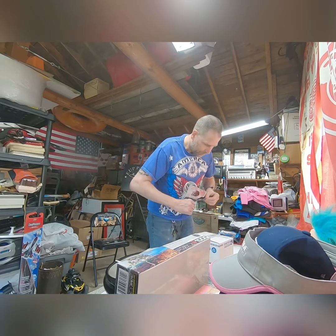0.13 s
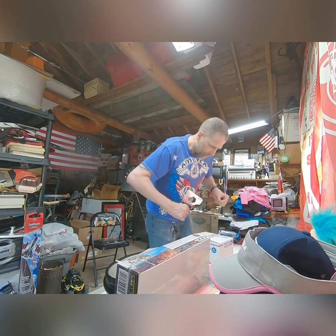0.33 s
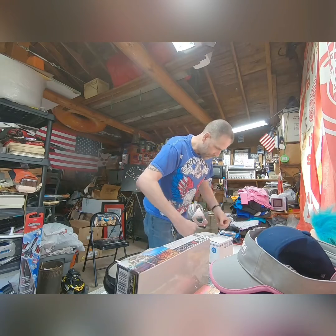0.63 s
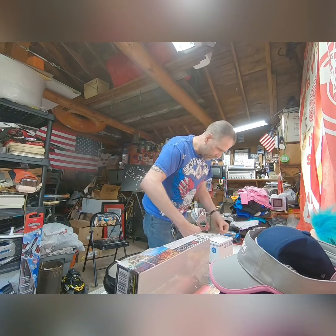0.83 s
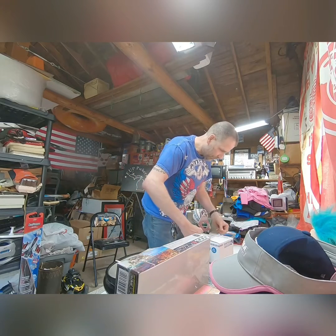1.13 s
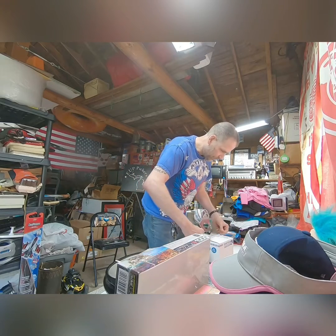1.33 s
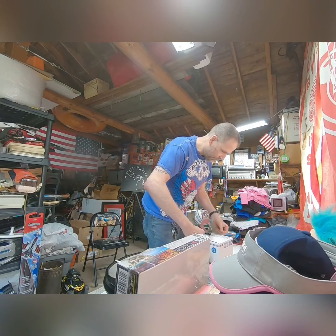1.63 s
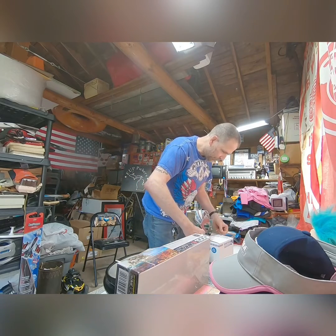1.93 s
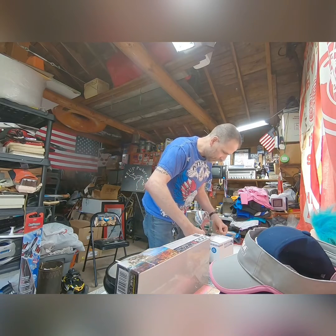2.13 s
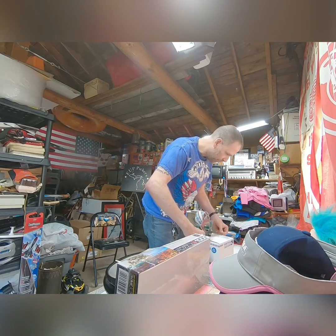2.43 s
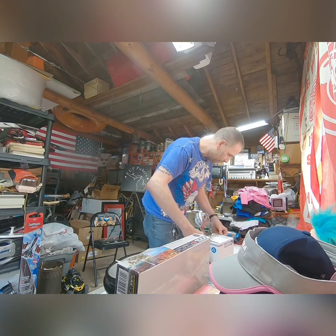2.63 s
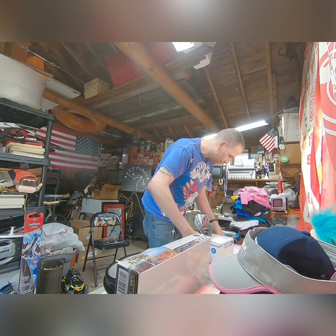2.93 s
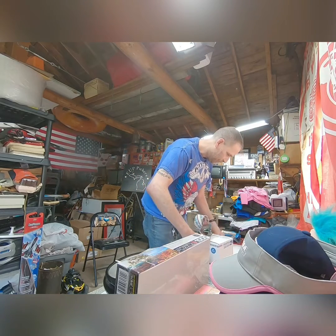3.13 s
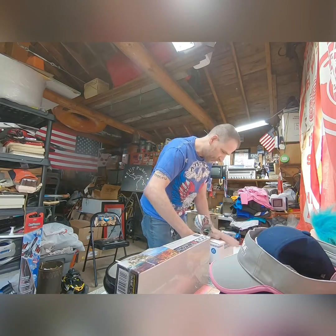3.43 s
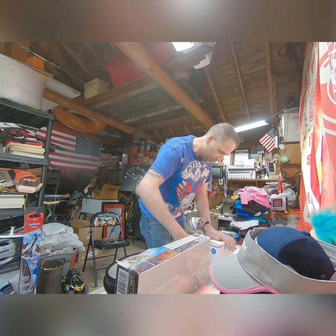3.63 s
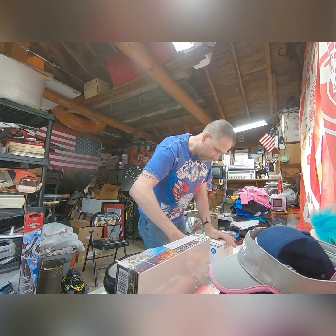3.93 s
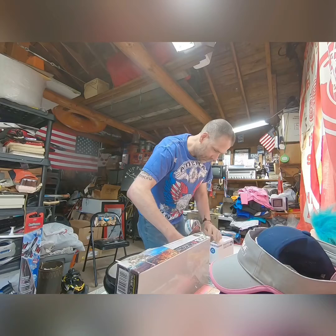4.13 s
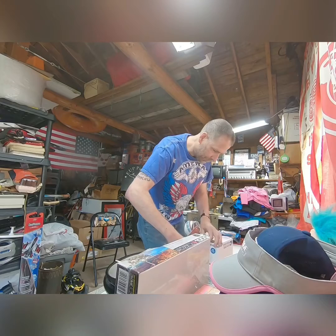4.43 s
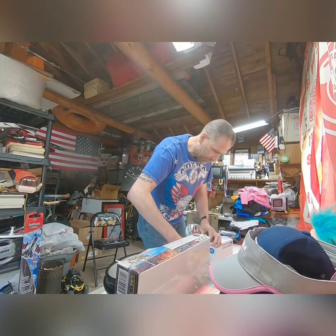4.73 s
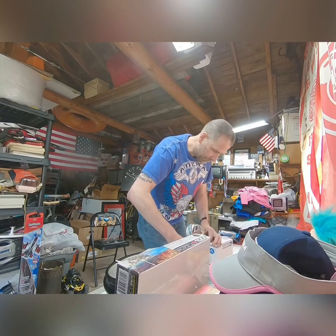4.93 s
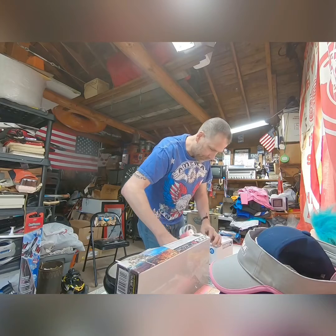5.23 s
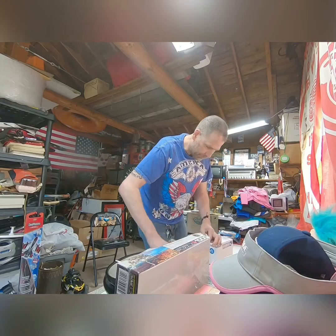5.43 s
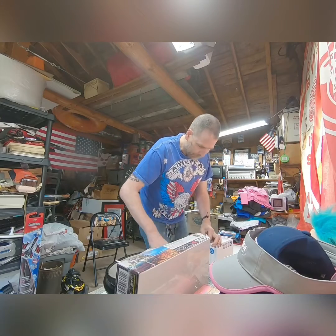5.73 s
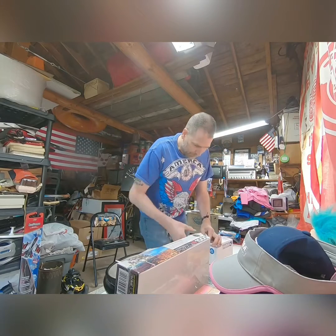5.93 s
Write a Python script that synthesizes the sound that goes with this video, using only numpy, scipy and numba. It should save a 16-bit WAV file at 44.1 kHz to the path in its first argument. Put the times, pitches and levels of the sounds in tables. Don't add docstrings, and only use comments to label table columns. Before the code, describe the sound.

Almost at once, packing tape is jerked from a hand-held gun with a bright, dry rip. Only a faint low hum and tiny ticks follow. Later come hand scuffs on cardboard, deep box and bench knocks, and clusters of screeching, cracking tape pulls. The last pulls end in a run of muffled thumps. Close small stereo microphone, short damped garage.

```python
import sys
import numpy as np
from scipy import signal
from scipy.fft import rfft, irfft, next_fast_len
from scipy.io import wavfile
from scipy.ndimage import uniform_filter1d
from numba import njit

SR = 44100
rng = np.random.default_rng(int(sys.argv[2]) if len(sys.argv) > 2 else 0)


def undo_db(level):
    steps = np.asarray(level, float) / 20
    return 10 ** steps


def digitize_waveform(pressure):
    field = np.atleast_2d(pressure).T
    bounded = np.clip(field, -1, 1)
    quanta = np.round(bounded * 32767).astype(np.int16)
    wavfile.write(sys.argv[1], SR, quanta)


N = 269010
SPLIT_HZ = 3880
ON_BOX_S = 1.5

# pitch_hz, level_db [dB per Hz]
SLIP_COLOUR = [(240, -29.5), (400, 2.5), (481, -12), (676, -7.5), (742, -9.5), (1140, -7), (1270, -12),
               (1460, -2.5), (1840, -5.5), (2800, -1.5), (4730, -0.5), (8370, -3), (13500, -25.5),
               (14800, -37.5), (16000, -52.5)]
# pitch_hz, width_hz, level_db
GUN_RINGS = [(1160, 58, -5), (1670, 40, -2), (1960, 26, -4), (2160, 73, -4), (2860, 99, -1), (3670, 150, 0),
             (3980, 40, -1), (5700, 47, -8), (7270, 89, -6), (8140, 170, -9)]
# pitch_hz, width_hz, level_db
BOX_AIR = [(70, 32, 0.5), (100, 11, 6), (150, 25, 1.5), (181, 36, -1.5)]
# pitch_hz, width_hz, level_db
BOX_WALLS = [(247, 71, 1.5), (347, 37, -1), (420, 35, -8), (600, 200, -11.5)]


def unit(x):
    return x / np.sqrt(np.mean(x ** 2))


def on_log(hz, table):
    f, v = np.transpose(table)
    return np.interp(np.log(hz + 1), np.log(f), v)


def colour(x, table):
    log_gain = on_log(np.fft.rfftfreq(4096, 1 / SR), table) * np.log(10) / 20
    cepstrum = irfft(log_gain)
    cepstrum[1:2048] *= 2
    cepstrum[2049:] = 0
    response = irfft(np.exp(rfft(cepstrum)))
    return signal.fftconvolve(x, response)[:len(x)]


def band(x, hz, width_hz):
    return signal.lfilter(*signal.iirpeak(hz, hz / width_hz, fs=SR), x)


def ring(x, modes):
    return sum((-1) ** k * undo_db(db) * band(x, hz, width) for k, (hz, width, db) in enumerate(modes))


def cut(x, order, hz, kind="low"):
    return signal.sosfilt(signal.butter(order, hz, kind, fs=SR, output="sos"), x)


def halves(x):
    return unit(cut(x, 4, SPLIT_HZ)), unit(cut(x, 4, SPLIT_HZ, "high"))


def walk(rate):
    k = int(SR / rate)
    steps = np.repeat(rng.standard_normal(N // k + 1), k)
    return 1.7 * uniform_filter1d(uniform_filter1d(steps, k), k)[:N]


def add(out, s, sound):
    i = int(s * SR)
    out[..., i:i + sound.shape[-1]] += sound[..., :N - i]


def opposite(x):
    return x * np.array([[1], [-1]])


def bursts(rows, attack_s, fall_db_s):
    gain, t = np.zeros(N), np.arange(SR // 3) / SR
    for s, hold, db in rows:
        rise = np.minimum(t / (attack_s + 0.3 * abs(hold)), 1)
        fall_db = fall_db_s * np.maximum(t - attack_s - abs(hold), 0)
        add(gain, s, undo_db(db - fall_db) * rise)
    return gain


def hum():
    # pitch_hz, level_db [dB per Hz]
    hum_colour = [(12, -49.5), (20, -9.5), (85, -10), (112, -18.5), (125, -6), (148, -4.5), (211, -14),
                  (263, -24), (386, -30.5), (468, -43.5), (725, -28), (1010, -36), (2490, -45.5),
                  (4810, -43), (14000, -57)]
    level_db = -64.5
    mid, side = (colour(rng.standard_normal(N), hum_colour) for _ in range(2))
    side = cut(side, 1, 500, "high")
    deep = cut(mid, 2, 120)
    swell = undo_db(4 * walk(4.5) - 3.5)
    pair = mid + (swell - 1) * deep + undo_db(6.5) * opposite(side)
    return undo_db(level_db + 0.2 * walk(6.6)) * pair / np.std(mid)


def room(x):
    # pitch_hz, share [0 to 1]
    likeness = [(100, 0.59), (350, 1), (700, 0.56), (2500, 1), (6000, 0.28)]
    # pitch_hz, fall_s
    echo_fall = [(150, .3), (1000, .29), (4000, .25), (10000, .18)]
    first_echo_s = 0.0021
    t, echo = np.arange(SR // 2) / SR, 0
    for hz in 60 * 2 ** np.arange(0, 8.1, .5):
        mid, side = (unit(band(rng.standard_normal(len(t)), hz, hz / 3)) for _ in range(2))
        like = np.clip(on_log(hz, likeness), 0, 1)
        fall_s = on_log(hz, echo_fall)
        pair = np.sqrt(1 + like) * mid + opposite(np.sqrt(1 - like) * side)
        echo = echo + np.sqrt(hz / fall_s) * pair * undo_db(-60 * t / fall_s)
    echo = echo * (t > first_echo_s)
    return signal.fftconvolve(x[None], echo / np.sqrt(np.sum(echo ** 2) / 2))[:, :N]


def scatter(x):
    # pitch_hz, level_db
    apart = [(60, -15), (110, -15.5), (200, -16), (380, -15), (700, -4.5), (1290, -7), (2380, -8.5),
             (4400, -15.5), (8120, -1), (15000, -5)]
    t = np.arange(2048) / SR
    bounce = rng.standard_normal(len(t)) * np.exp(-t / .014)
    bounce = bounce / np.sqrt(np.sum(bounce ** 2))
    side = colour(signal.fftconvolve(x, bounce)[:N], apart)
    return undo_db(3.5) * opposite(side)


def scuffs():
    # pitch_hz, width_hz, level_db
    card = [(260, 61, 13), (509, 160, 4.5), (737, 1400, -0.5)]
    # start_s, hold_s, level_db
    slides = [(2.04, 0.0092, -56.5), (2.7, 0.024, -55), (2.765, 0.008, -47.5), (2.87, 0.14, -61.5),
              (4.09, 0.015, -67), (4.175, 0.04, -58), (4.4, 0.04, -63.5), (4.55, 0.029, -68),
              (4.61, .02, -60.5), (4.67, 0.02, -78), (5.19, 0.011, -60), (5.27, .005, -85),
              (5.315, .01, -70)]
    skin = rng.standard_normal(N) * undo_db(2 * walk(70))
    drag = ring(ring(skin, card), [(520, 800, 0)])
    return bursts(slides, attack_s=0.0041, fall_db_s=226) * undo_db(-3.0) * unit(drag)


def knocks(rows, wall_hz):
    out, t = np.zeros(N), np.arange(SR // 2) / SR
    push = t / .0015 * np.exp(-t / 0.0035)
    air = ring(push, BOX_AIR)
    wall = ring(push, [(wall_hz, 60, 3)] + BOX_WALLS)
    air, wall = air / np.abs(air).max(), wall / np.abs(wall).max()
    for s, db, hz, fall_db, wall_db in rows:
        boom_fall = undo_db(min(fall_db, -1.5) * hz * t)
        boom = np.sin(2 * np.pi * hz * t) * boom_fall * (1 - np.exp(-t / 0.0055))
        thud = boom + undo_db(-8.0) * (s > ON_BOX_S) * air + undo_db(wall_db) * wall
        add(out, s, undo_db(db - 3) * thud)
    return out


def thumps():
    # start_s, peak_db, boom_hz, decay_db [per cycle], wall_ring_db
    bench_hits = [(2.77, -28, 76, -7, -4.5), (3.009, -18, 84, -7, -12), (3.048, -13.5, 81, -9.5, -6.5),
                  (3.086, -48, 64, -4, -22), (3.129, -24.5, 66.4, -17, -25),
                  (3.466, -2.5, 92.3, -6.5, -14.5), (3.55, -22.5, 92, -3, 4.5), (3.607, -26, 84, -1, -2),
                  (3.754, -48, 75.4, 2, -23), (3.843, -27.5, 67.5, -2.5, 2), (4.19, -29.5, 70, -4.5, -8.5),
                  (4.223, -25, 62.5, -22, -25), (4.819, -36, 90, -4, -4.5), (4.86, -38, 99, 0, 1.5),
                  (5.013, -15.5, 97, -3.5, -9.5), (5.357, -35.5, 95, -3, -24), (5.523, -23, 75.5, -2, -7),
                  (5.584, -16, 67, -3.5, -1), (5.618, -15.5, 70, -17, -4), (5.645, -14.5, 63, -30, -3),
                  (5.699, -23.5, 64.6, -4, -27), (5.76, -20, 74, -15, -8.5), (5.912, -26.5, 65.2, -24, -18)]
    return knocks(bench_hits, wall_hz=215)


def raps():
    # start_s, peak_db, boom_hz, decay_db [per cycle], wall_ring_db
    box_hits = [(.228, -19, 195, -3, 2.3), (2.048, -75.5, 147.5, -5, -3), (2.443, -46.5, 193, -2.5, 4),
                (2.679, -43.5, 167, -2.5, -0.5), (3.43, -17, 199, -4, -14.5), (4.028, -21, 150, -15, -20),
                (4.67, -41, 129, -9, -19), (4.954, -23, 157, -2, -8), (4.985, -20, 134, -9, 2),
                (5.51, -14.5, 115.3, -9.5, -23), (5.738, -27.5, 157, 4.5, 2), (5.863, -22, 181, -6.5, -14)]
    return knocks(box_hits, wall_hz=370)


def box_shakes():
    # start_s, hold_s, level_db
    shake_rows = [(.215, 0.013, -21), (.24, .1, -35.5), (3.005, 0.005, -26), (3.045, 0.0017, -24.5),
                  (3.44, 0.1, -25), (3.55, 0.086, -26.5), (3.74, 0.033, -24), (3.825, 0.026, -30),
                  (4.025, 0.015, -27.5), (4.19, 0.14, -58.5), (4.4, 0.039, -55), (4.93, 0.043, -23),
                  (5.01, 0.011, -35.5), (5.055, 0.011, -26.5), (5.585, 0.0093, -19), (5.62, 0.026, -30)]
    shake = rng.standard_normal(N)
    push = bursts(shake_rows, attack_s=0.0099, fall_db_s=352.5) * shake
    on_box = np.arange(N) / SR > ON_BOX_S
    rumble = ring(push * on_box, BOX_AIR) + undo_db(-6.0) * ring(push, BOX_WALLS)
    return undo_db(-8) * rumble / np.std(ring(shake, BOX_AIR))


def squeals():
    # start_s, length_s, pitch_hz,
    # level_db
    squeal_rows = [(0.207, 0.012, 6960, -25), (3.135, 0.09, 2900, -54), (3.561, 0.0065, 2890, -19),
                   (4.03, 0.031, 4050, -36), (4.818, 0.022, 3510, -26), (4.818, 0.019, 1534, -41),
                   (4.863, 0.018, 3530, -37), (4.941, .025, 3930, -24), (5.062, 0.026, 7370, -28),
                   (5.099, .02, 3900, -50), (5.171, 0.018, 4120, -49), (5.588, 0.0097, 2810, -53),
                   (5.595, 0.14, 4000, -46.5), (5.644, 0.018, 2810, -32.5), (5.641, 0.038, 2180, -40),
                   (5.631, 0.072, 7430, -44)]
    out, t = np.zeros(N), np.arange(4096) / SR
    for s, length, hz, db in squeal_rows:
        rub = unit(band(rng.standard_normal(4096), hz, .03 * hz))
        swell = np.sin(np.pi * np.clip(t / length, 0, 1))
        add(out, s, undo_db(db) * rub * swell)
    return out


def snaps():
    # start_s, peak_db, treble_db, ring_hz
    snap_rows = [(.173, -19.5, -15, 3157), (2.409, -64, -13.5, 1790), (2.4471, -41.5, -16.5, 3630),
                 (2.4564, -44, -20, 3200), (3.0065, -46.5, -15, 1690), (3.049, -38, -9, 2200),
                 (3.4276, -50, -15.5, 1580), (3.479, -25.5, -1.5, 3730), (3.7303, -27, -1, 1960),
                 (3.7472, -26.5, -11, 3200), (3.8335, -29.5, -26, 2800), (3.8482, -24.5, -20, 2830),
                 (4.0281, -24.5, -10, 4060), (4.5534, -46, -19, 2570), (4.5987, -49, -25, 1530),
                 (4.6112, -44, -16, 3250), (4.672, -42.5, -13.5, 3160), (4.773, -55.5, -14, 3570),
                 (4.8162, -25.5, -9.5, 3440), (4.8599, -24, -12.5, 3950), (4.9207, -37.5, 3, 3670),
                 (4.9417, -23.5, -9, 3570), (5.011, -17.5, -12, 3180), (5.032, -27.5, -7.5, 3960),
                 (5.1085, -34, -28.5, 3930), (5.1645, -38.5, -18, 3270), (5.2716, -39, -22.5, 1700),
                 (5.3225, -42, -11.5, 3250), (5.5829, -48, -45, 2940), (5.6446, -34, -24, 2800)]
    # start_s, peak_db, ring_hz
    tick_rows = [(.8644, -72, 1660), (1.4094, -74, 4070), (2.044, -62, 2100), (2.7062, -56, 1680),
                 (2.7701, -53, 1870), (2.8988, -48, 3810), (3.1413, -44, 2850), (3.1946, -47, 3010),
                 (3.2894, -57, 4630), (5.4843, -50, 2790), (5.8636, -36, 3430), (6.0556, -44, 3790),
                 (6.0744, -46, 1980)]
    tick_treble_db, own_ring_db, pan_spread_db = -18, -2, 2.5
    out, t = np.zeros((2, N)), np.arange(4096) / SR
    for s, db, treble_db, hz in snap_rows + [(s, db, tick_treble_db, hz) for s, db, hz in tick_rows]:
        fade = np.exp(-t / .0012) + undo_db(-13) * np.exp(-t / .012)
        burst = rng.standard_normal(len(t)) * fade
        low, high = halves(colour(burst, SLIP_COLOUR))
        own = unit(band(burst, hz, .13 * hz))
        gun = unit(ring(burst, GUN_RINGS))
        crack = low + undo_db(treble_db + 9.0) * high + undo_db(own_ring_db) * own + undo_db(-12) * gun
        pan_db = opposite(pan_spread_db * rng.standard_normal()) / 2
        add(out, s, crack / np.abs(crack).max() * undo_db(db + 9.0 + pan_db))
    return out


@njit
def sweep(x, hz, share):
    y, b, l = np.empty(len(x)), 0., 0.
    for i in range(len(x)):
        g = np.tan(np.pi * hz[i] / SR)
        v = (b + g * (x[i] - l)) / (1 + g * (g + share))
        b, l, y[i] = 2 * v - b, l + 2 * g * v, share * v
    return y


def pulls():
    # start_s, hold_s, slip_db, treble_db, taut_tape_hz
    jerk_rows = [(.172, 0.055, -22, -5.5, 2990), (0.226, 0.096, -27, -4.5, 2777),
                 (2.033, 0.0074, -75, -12.5, 2100), (3.005, 0.014, -47, -3.5, 3050),
                 (3.047, 0.0021, -41, -1.5, 2700), (3.438, 0.042, -43, -14.5, 3700),
                 (3.474, 0.059, -36, -2, 3160), (3.524, .045, -24.5, -5.5, 3280),
                 (3.592, 0.047, -26.5, -5.5, 3290), (3.747, 0.037, -26, -4.5, 3130),
                 (3.827, 0.017, -38, -2, 3330), (4.026, 0.016, -31, -4.5, 3440),
                 (4.178, 0.032, -53.5, -37, 2830), (4.265, 0.037, -57, -49, 2180),
                 (4.382, 0.047, -66.5, -19, 3200), (4.918, 0.0035, -42.5, -4, 3650),
                 (4.939, 0.02, -29.5, -9, 3850), (4.981, 0.014, -43, -17.5, 3500),
                 (5.014, 0.025, -32.5, -16.5, 3350), (5.049, 0.023, -25.5, -13, 3230),
                 (5.08, .035, -39, -32.5, 2400), (5.154, 0.015, -38, -34, 3300),
                 (5.582, 0.01, -36, -46, 2780), (5.632, .03, -34, -20, 2800)]
    attack_s, fall_db_s, ring_db, slacken_hz_s = .006, 518.5, -6, 895.5
    slips_per_s = 9000
    hits = (rng.random(N) < slips_per_s / SR) * rng.standard_normal(N)
    slips = unit(hits * undo_db(1.2 * rng.exponential(size=N)))
    gust_db = 2 * walk(150) + .6 * walk(45)
    low, high = halves(colour(slips * undo_db(gust_db), SLIP_COLOUR))
    force = bursts([row[:3] for row in jerk_rows], attack_s, fall_db_s)
    treble_rows = [(s, hold, db + treble_db) for s, hold, db, treble_db, _ in jerk_rows]
    sizzle = bursts(treble_rows, attack_s, fall_db_s)
    tape = force * low + sizzle * high * undo_db(2.5 * walk(67))
    drive = undo_db(ring_db) * force * slips

    t = np.arange(N) / SR
    start, taut_hz = np.array(jerk_rows)[:, 0], np.array(jerk_rows)[:, 4]
    last = np.maximum(np.searchsorted(start, t) - 1, 0)
    tape_hz = taut_hz[last] - slacken_hz_s * np.clip(t - start[last], 0, .2)
    span = sweep(drive * undo_db(1.9 * walk(120)), tape_hz, 0.037)

    treble_drive = undo_db(ring_db + 5.5) * sizzle * slips
    gun = np.zeros(N)
    for hz, width, db in GUN_RINGS:
        source = drive if hz < SPLIT_HZ + 200 else treble_drive
        gun += undo_db(db) * band(source * undo_db(3 * walk(50)), hz, 0.76 * width)
    return undo_db(-1.0) * tape + undo_db(12.5) * span + undo_db(16) * gun


def in_air(x):
    thin = cut(x, 3, 1250, "high")
    return np.where(np.arange(N) < ON_BOX_S * SR, thin, x)


def scene():
    tape = pulls()
    shake = box_shakes()
    tape = in_air(tape) + squeals()
    crack = in_air(snaps())
    low = thumps() + raps() + shake + scuffs()
    bright = tape + crack.mean(axis=0)
    quarter_turn = signal.hilbert(low, next_fast_len(N)).imag[:N]
    low_pair = low + undo_db(-18.5) * opposite(quarter_turn)
    direct = tape + crack + low_pair
    return direct + scatter(bright) + undo_db(-4) * room(bright + undo_db(-4.5) * low) + hum()


def low_pass(x):
    return signal.sosfilt(signal.butter(12, 16480, fs=SR, output="sos"), x)


def record(dry):
    limit = .4
    rounded = limit * np.tanh(dry / limit)
    mix = cut(rounded, 8, 14200)
    mix = cut(mix, 2, 44, "high")
    return low_pass(mix)


dry = scene()
out = record(dry)
digitize_waveform(out)
```